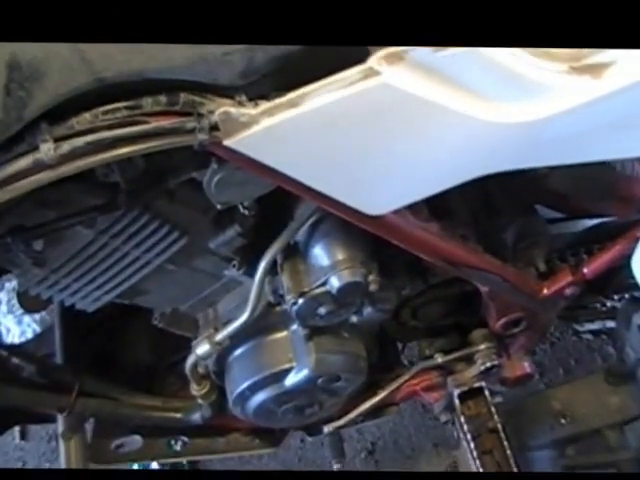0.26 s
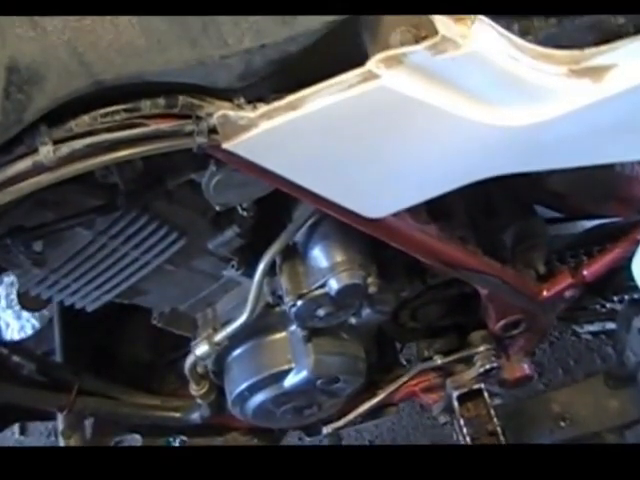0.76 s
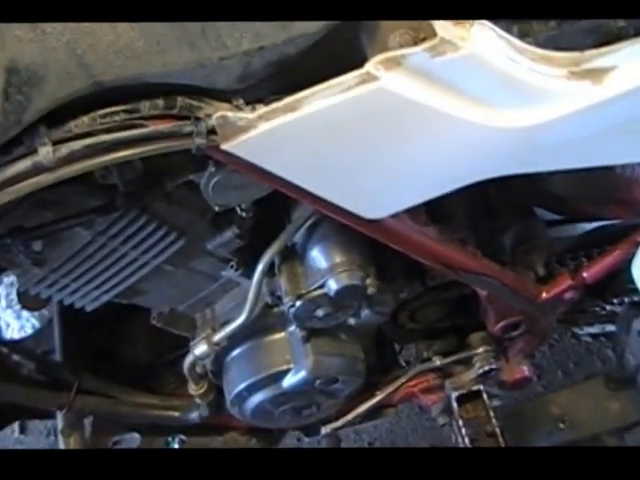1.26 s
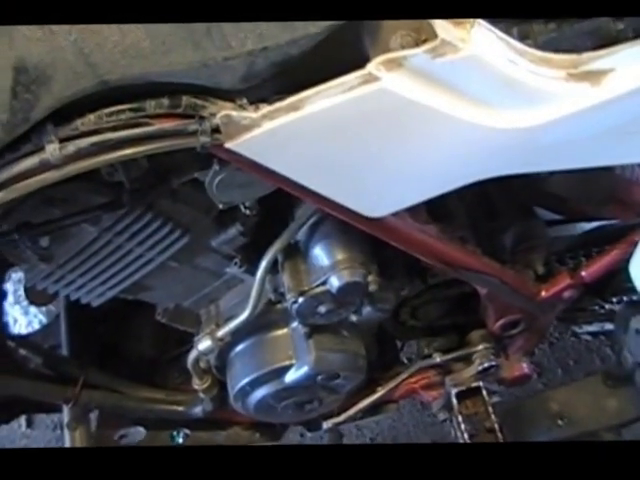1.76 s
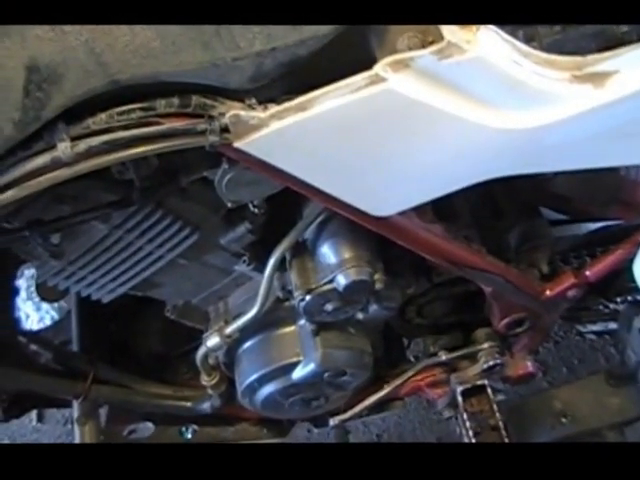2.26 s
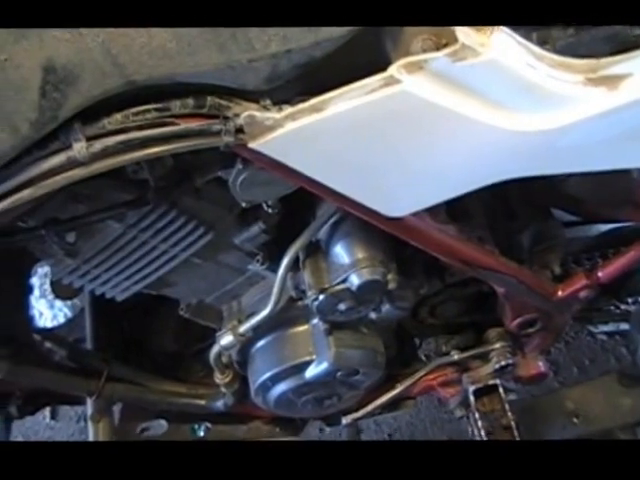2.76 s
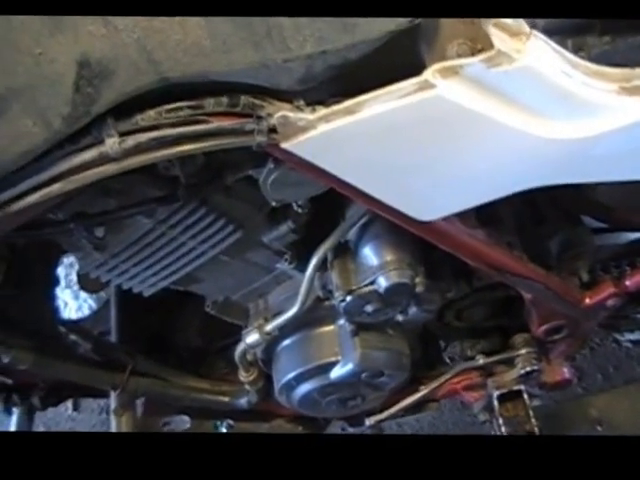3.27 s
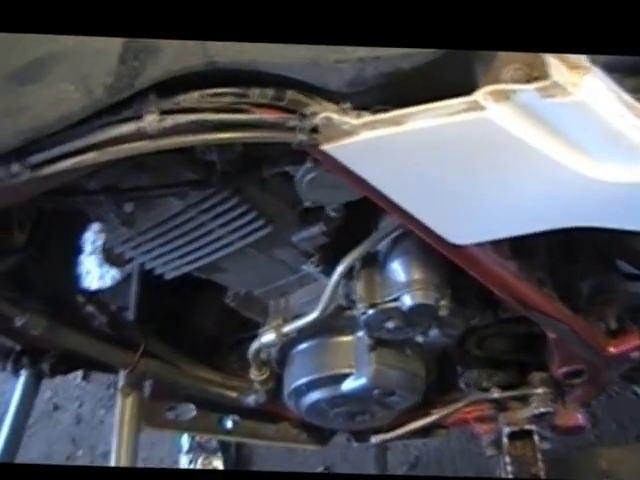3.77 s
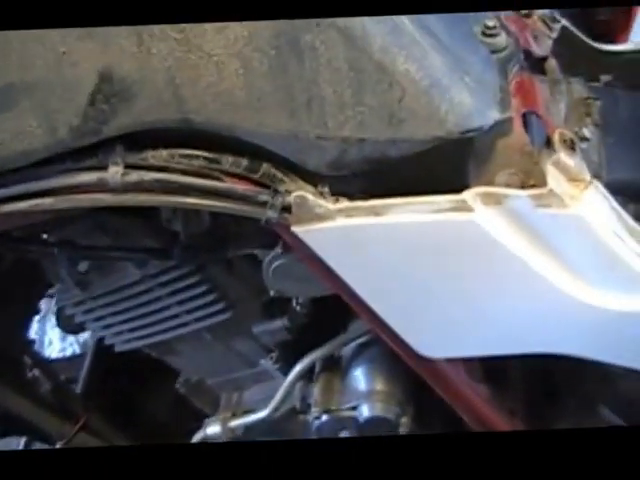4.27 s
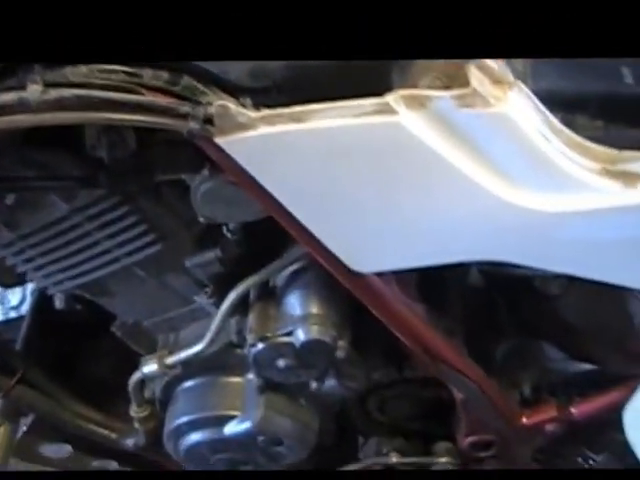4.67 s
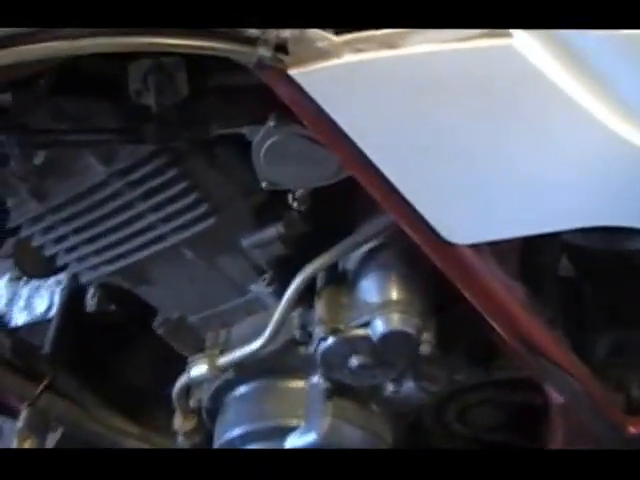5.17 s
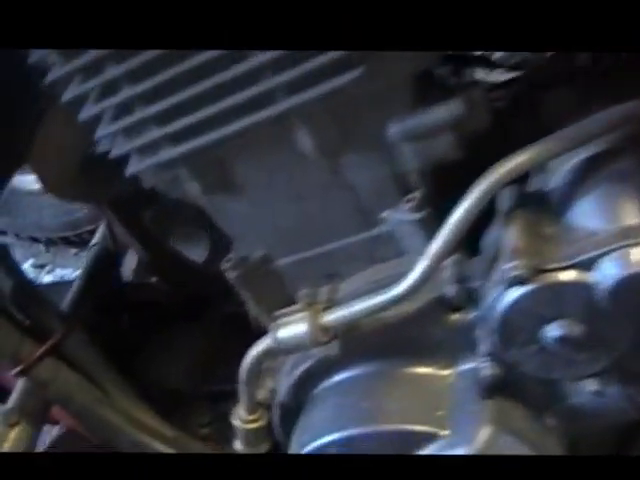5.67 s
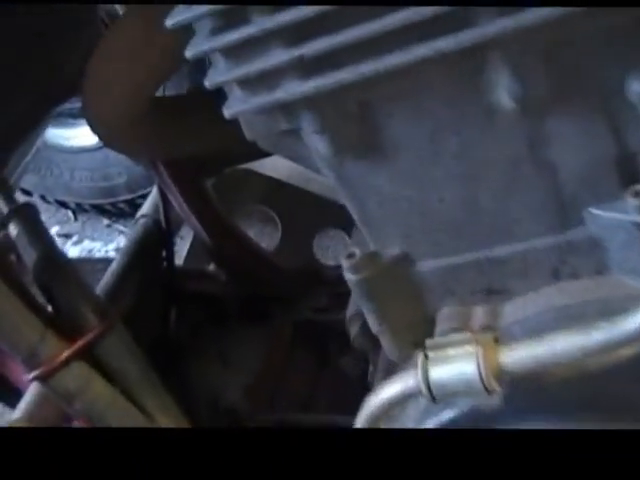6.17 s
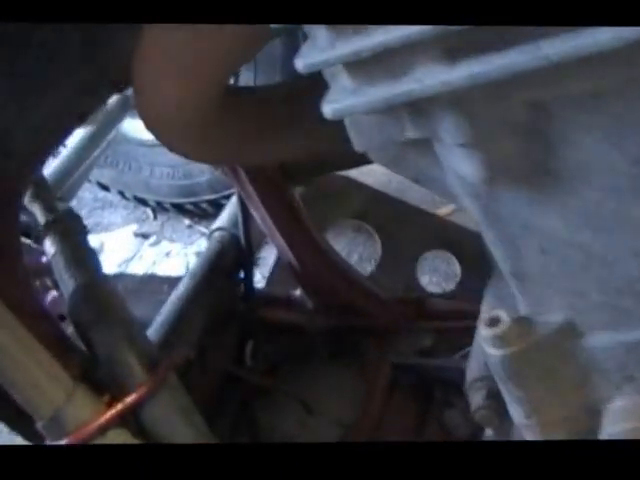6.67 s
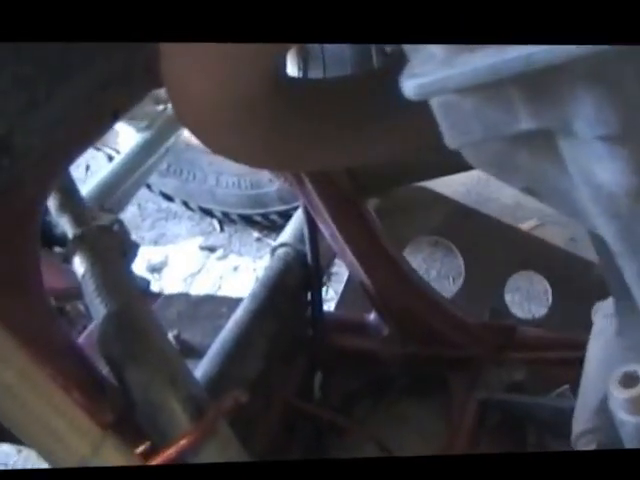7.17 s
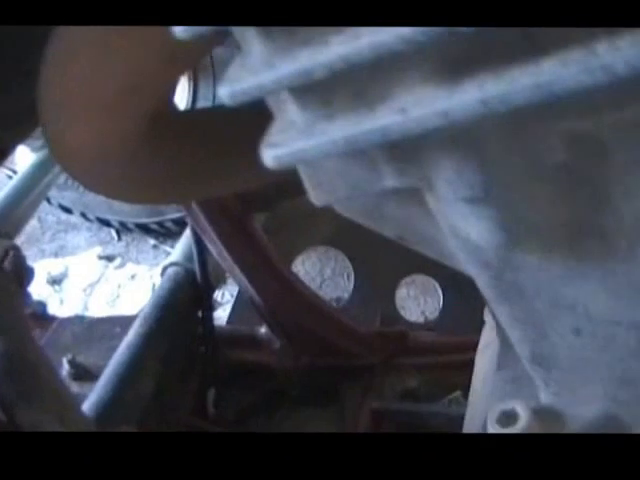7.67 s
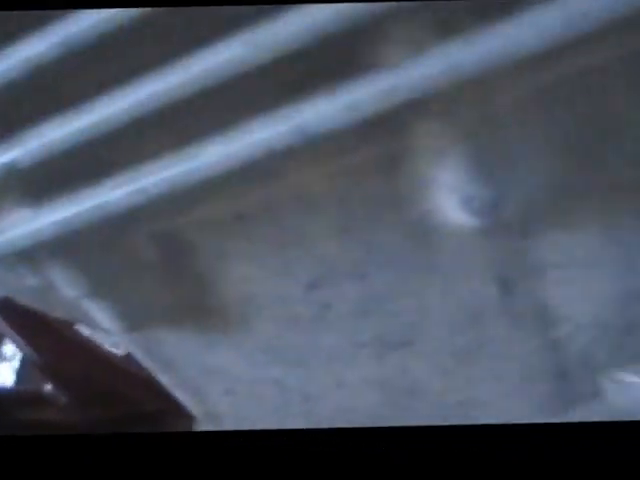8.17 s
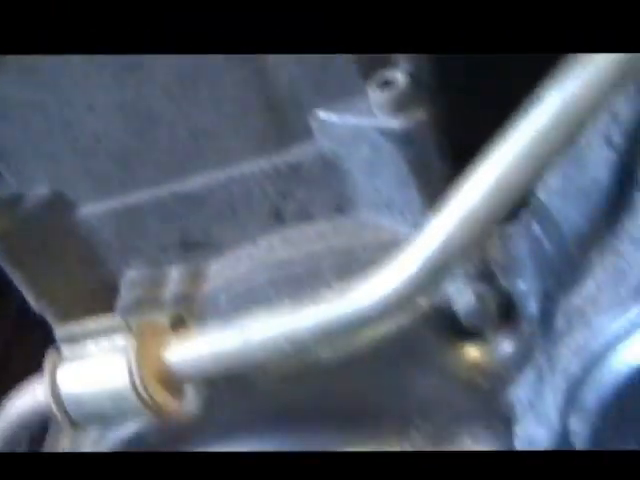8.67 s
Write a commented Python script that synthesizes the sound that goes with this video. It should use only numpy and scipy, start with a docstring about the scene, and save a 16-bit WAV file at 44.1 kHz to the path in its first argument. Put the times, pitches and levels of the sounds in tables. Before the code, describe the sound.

In a garage, an electric starter clanks in and grinds with a metallic squeal. A small single-cylinder four-stroke engine fires once and runs down. On the second try it coughs and catches, puffing loudly on the throttle, then settles into a steady puttering idle. The hand-held microphone moves up to the cylinder, so the ticking valve clatter and gear whine grow louder and clearer.

```python
"""A small one-cylinder four-stroke engine is started in a garage, heard from a hand-held microphone.
The electric starter grinds, the engine fires once and runs down; on the second try it catches and idles.
In each cycle gas puffs from the exhaust, the valves clatter, the gears whine and the piston gulps air.
Their loudness follows the throttle, the speed and the microphone, which moves up to the cylinder and
on to the front. The walls echo, and behind it all are a faint hiss and a faint ticking."""
import sys
import numpy as np
from scipy import signal
from scipy.fft import rfft, irfft, next_fast_len
from scipy.io import wavfile

SR = 44100
rng = np.random.default_rng(int(sys.argv[2]) if len(sys.argv) > 2 else 0)


def unload_audio(sound):
    """Save the sound as a 16-bit wav file, at the path given as the first command line argument."""
    columns = np.transpose(np.atleast_2d(sound))
    # keep every value between -1 and 1, then stretch to whole-number steps
    steps = np.round(np.clip(columns, -1, 1) * 32767)
    wavfile.write(sys.argv[1], SR, steps.astype(np.int16))


N = 392931
TIME = np.arange(N) / SR
IDLE_HZ = 14.1  # firings per second at idle

# lone firings before the engine runs: (time [s], level [dB], puff pitch [Hz])
LONE_FIRINGS = [(1.015, -5, 143), (2.5566, -7.5, 147), (2.771, -11.5, 114)]
# strokes that only pump air out and back in: (time [s], level [dB], pitch [Hz], wait for the gulp [s])
AIR_STROKES = [(1.114, -17.5, 76, 0.024), (1.229, -18, 60, 0.027), (1.39, -24.5, 60, 0.087),
               (1.56, -31.5, 90, 0.043), (2.307, -23.5, 55, .063), (2.68, -22, 107, 0.026)]
# loudness of the puffs; every LOUDNESS table lists (base level [dB], change at full throttle [dB],
# change at the cylinder [dB], change at the front [dB], change per extra firing a second [dB])
EXHAUST_LOUDNESS = (-15, 7, -0.04, -4, 0.08)
def exhaust(at, idle_hz=170, throttle_hz=36, near_hz=15, uneven_db=-1.37, gulp_db=-3.0, gulp_ratio=1.32):
    """Each firing pushes out a puff: louder and deeper with the throttle open, higher from close by."""
    out, chance = np.zeros(N), rng.standard_normal((len(at), 2))
    level_db = loudness(EXHAUST_LOUDNESS, at) + uneven_db * chance[:, 1]
    pitch_hz = idle_hz - throttle_hz * curve(THROTTLE, at)[0] + near_hz * curve(MIC_PATH, at)[0]
    pitch_hz *= 1 + 0.026 * chance[:, 0]
    for row in list(LONE_FIRINGS) + list(zip(at, level_db, pitch_hz)):
        add(out, *puff(*row))
    for s, db, hz, wait in AIR_STROKES:
        add(out, *puff(s, db, hz))
        add(out, *puff(s + wait, db + gulp_db, hz * gulp_ratio))
    return out


# first wall echoes, heard beside the machine and at the cylinder: (delay [ms], strength [factor])
FAR_ECHOES = [(2.93, 0.35), (4.78, 0.57), (7.98, 0.27), (10.58, 0.91), (19.58, -0.41), (26.96, -0.28),
              (30.35, 0.14), (33.02, -0.28), (37.94, 0.16)]
NEAR_ECHOES = [(2.05, 0.75), (9.32, 0.52), (10.89, 0.65), (16.76, 0.54), (18.27, -0.51), (20.47, 0.33),
               (30.6, 0.3), (32.47, -0.26), (41.93, -0.39)]
# low notes at which the silencer and garage boom: (pitch [Hz], width [Hz], level [dB])
BOOM_NOTES = [(68, 52, 7.5), (126, 12.2, 15.5), (145.5, 13, 12.5), (191, 11, 13.5), (258.9, 25.1, 20),
              (333.4, 5, 12.5), (445.6, 23, 7.5), (521.2, 12, 18), (710, 30, -21)]
def puff(s, db, pitch_hz, cut_hz=59, body_hz=45, knee=2.45, leak=0.56, bass_lag_s=0.0022, bass_hz=90):
    """One burst of gas with its wall echoes and boom; gives back its start time and its sound."""
    size, lead = 2 ** 14, 2 ** 9
    hz = np.fft.rfftfreq(size, 1 / SR)[:size // 16]
    pulse = hz / pitch_hz * np.exp(-hz / pitch_hz)
    muffled_hz = knee * pitch_hz * (pitch_hz / 160) ** 0.36
    pulse *= leak + 1 / (1 + (hz / muffled_hz) ** 10)  # the silencer swallows most of the upper part
    u = 1j * hz / body_hz
    pulse *= abs(u * u / (u * u + u + 1)) ** 2  # a small pipe gives off no deep bass
    pulse *= 1 - np.exp(-(hz / cut_hz) ** 10)
    bass_lag = bass_lag_s * bass_hz * np.tanh(hz / bass_hz)  # the bass leaves the silencer last
    pulse = pulse * np.exp(-2j * np.pi * (bass_lag + hz * lead / SR))
    near = curve(MIC_PATH, s)[0]
    far_walls, near_walls = (sum(gain * np.exp(-2j * np.pi * hz * ms / 1000) for ms, gain in echoes)
                             for echoes in (FAR_ECHOES, NEAR_ECHOES))
    walls = 1 + (1 - near) * far_walls + near * near_walls
    sound = irfft(pulse * walls * (1 + resonances(BOOM_NOTES, hz)), size)
    strength = np.sqrt(np.sum(sound ** 2) / (0.036 * SR))  # as if packed into 36 ms
    return s - lead / SR, amp(db) * sound / strength


# engine speed from the moment it catches: (time [s], speed [firings per s])
ENGINE_SPEED = [(2.895, 10.733), (3.4, 11.09), (3.743, 12.642), (3.933, 12.423), (4.79, 14.065),
                (5.244, 13.711), (5.687, 14.27), (5.953, 13.252), (6.322, 14.828), (6.785, 14.35),
                (7.417, 14.134), (7.835, 16.674), (8.155, 14.657), (8.8, 14.067)]
def firings():
    """Times at which the running engine fires, once in each whole cycle."""
    t = TIME[TIME >= ENGINE_SPEED[0][0]]
    cycles_done = np.cumsum(curve(ENGINE_SPEED, t)[0]) / SR
    return np.interp(np.arange(int(cycles_done[-1]) + 1), cycles_done, t)


# the throttle is held open to start, then let go: (time [s], opening [0-1])
THROTTLE = [(2.9, 0.98), (3.95, 0.69), (4.14, 0.13), (4.9, 0.04)]
# where the microphone is: (time [s], nearness to the cylinder [0-1], way to the front [0-1])
MIC_PATH = [(5.2, .2, 0.12), (6.25, .94, 0.44), (7.1, 0.92, 1), (8.8, 1, 0.87)]
def loudness(table, t=TIME):
    """Level in dB of one engine part, from the throttle, the speed and the microphone's place."""
    base_db, throttle_db, near_db, front_db, speed_db = table
    near, front = curve(MIC_PATH, t)
    opening = curve(THROTTLE, t)[0]
    extra_speed = curve(ENGINE_SPEED, t)[0] - IDLE_HZ
    return base_db + throttle_db * opening + near_db * near + front_db * front + speed_db * extra_speed


# loudness of the pipe's note, columns as in EXHAUST_LOUDNESS
BARK_LOUDNESS = (-33.5, 5.5, -1, 9, -0.6)
def pipe_barks(at, hz=532, width_hz=70, decay_s=0.025):
    """The gas of each firing sets the exhaust pipe ringing with a hollow note."""
    rows = np.c_[at, loudness(BARK_LOUDNESS, at), np.full(len(at), decay_s)]
    return blows(rows, rise_s=0.0067) * resonate(grit(9000, 0.64), hz, width_hz)


# loudness of the gulps, columns as in EXHAUST_LOUDNESS
GULP_LOUDNESS = (-52.5, 0, 3, 9, -4)
def air_gulps(at, cycle_share=.76, pitch_hz=115):
    """Late in each cycle the piston gulps air through the filter box."""
    out, when = np.zeros(N), at + cycle_share * np.gradient(at)
    for s, db in zip(when, loudness(GULP_LOUDNESS, when)):
        add(out, *puff(s, db, pitch_hz))
    return out


# loudness of the clatter, columns as in EXHAUST_LOUDNESS
CLATTER_LOUDNESS = (-34, 12.5, 15, -0.45, 0.56)
def valve_cycles(at, starting_period_s=.09, starting_db=-25):
    """Time, length and clatter level of each cycle, first on the starter and then running."""
    strokes = [row[0] for row in list(LONE_FIRINGS) + list(AIR_STROKES)]
    each = np.ones(len(strokes))
    period_s = np.r_[starting_period_s * each, np.gradient(at)]
    level_db = np.r_[starting_db * each, loudness(CLATTER_LOUDNESS, at)]
    return np.r_[strokes, at], period_s, level_db


# tone of the valves' clatter and of their lighter tick: (frequency [Hz], level [dB])
CLATTER_TONE = [(200, -50.5), (550, 1.5), (1000, 3.5), (2000, -8), (3200, -3), (4300, 1.5), (5300, -3),
                (7500, 2), (9500, -4.5), (12000, -14), (14000, -22.5), (16500, -59)]
TICK_TONE = [(1500, -41), (3000, 12), (4400, -21), (5400, 16.5), (7200, 15), (9000, 7), (12000, -47),
             (16000, -52)]
def valves(at, period_s, level_db, slap_s=0.0148, scrape_lead_s=0.0037, bounce_s=0.0033, tick_s=0.0226):
    """The valves strike twice a cycle: a scrape leads into a slap that bounces, then comes a tick."""
    chance, each = rng.standard_normal((len(at), 4)), np.ones(len(at))
    slap_at = at + slap_s + 0.31 * (period_s - np.median(period_s)) + 0.00026 * chance[:, 0]
    bounce_at = slap_at + bounce_s * (1 + .2 * rng.standard_normal(len(at)))
    tick_at = slap_at + tick_s + .0005 * chance[:, 2]
    settling_db = np.interp(at, [3.6, 4.6], [-13, 0])  # the tick comes out as the idle settles
    passing_db = 8 * bump(at, 5.95, 0.28)  # the microphone passes the valve cover
    scrape = np.c_[slap_at - scrape_lead_s, level_db - 7, .008 * each]
    slap = np.c_[slap_at, level_db + 6 + .5 * chance[:, 1], .0055 * each]
    bounce = np.c_[bounce_at, level_db + 1, .004 * each]
    tick = np.c_[tick_at, level_db + settling_db + passing_db + 1.6 * chance[:, 3], .003 * each]
    strikes = np.hypot(blows(np.r_[slap, bounce], rise_s=0.0021), blows(scrape, rise_s=0.001))
    rattle = strikes * grit(22000, 0.56) * unit(amp(1.43 * drift(900)))
    ticks = blows(tick, rise_s=0.00084) * grit(17000, 1.0)
    return colour(rattle, CLATTER_TONE) + colour(ticks, TICK_TONE)


# loudness of the thuds, columns as in EXHAUST_LOUDNESS
THUD_LOUDNESS = (-27, 4, 4.5, -2.5, .3)
# their dull tone: (frequency [Hz], level [dB])
THUD_TONE = [(200, -31), (520, 2.5), (800, 3.5), (1300, 0.5), (2100, 2.5), (3200, -16), (8000, -45)]
def cylinder_thuds(at, cycle_share=0.189, decay_s=0.0078):
    """The top of the cylinder knocks as the valves slap."""
    when = at + cycle_share * np.gradient(at)
    rows = np.c_[when, loudness(THUD_LOUDNESS, at), np.full(len(at), decay_s)]
    return colour(blows(rows, rise_s=0.0027) * grit(9000, 1.0), THUD_TONE)


# tone of the churning chain and gears: (frequency [Hz], level [dB])
CHURN_TONE = [(35, -45), (60, -22), (130, 6), (300, 11), (520, 8.5), (620, 3), (780, 8), (930, -1),
              (1250, 3.5), (1550, -14), (2000, -8.5), (2500, -12.5), (7500, -12), (11000, -28),
              (15000, -69)]
# loudness of the churn and the whine, columns as in EXHAUST_LOUDNESS
CHURN_LOUDNESS = (-37, 7, 2, 2.5, 0.33)
WHINE_LOUDNESS = (-39.5, 3, 10, 1, 0.2)
def gears(angle, whine_hz=1345, bend=0.016):
    """Chain and gears churn and chatter, and their whine swells just before each firing."""
    churn = colour(grit(7000, 1.4), CHURN_TONE) * amp(loudness(CHURN_LOUDNESS) + 4.5)
    chatter = colour(grit(400, 4.5), CLATTER_TONE) * amp(loudness(CLATTER_LOUDNESS) - 24)
    teeth = resonate(grit(9000, 1.0), whine_hz * (1 + bend * np.cos(angle - 4.0)), width_hz=140)
    whine = unit(teeth * amp(7.5 * np.cos(angle - 6.0))) * amp(loudness(WHINE_LOUDNESS) - 1)
    return churn + chatter + whine


# loudness of the rasp, columns as in EXHAUST_LOUDNESS
RASP_LOUDNESS = (-46.5, 10.5, 7.5, -2.5, -0.5)
def carburettor(angle, rasp_hz=1900, bend=0.071):
    """Air rasps through the carburettor each time the cylinder breathes in."""
    rasp = resonate(grit(6000, 1.6), rasp_hz * (1 + bend * np.sin(angle - 4.9)), width_hz=660)
    passing_db = 6 * bump(TIME, 8.68, 0.19)  # the microphone passes it
    return unit(rasp * amp(8.6 * np.cos(angle - 5.2))) * amp(loudness(RASP_LOUDNESS) + passing_db)


# notes of the cylinder and its fins: (pitch [Hz], width [Hz], level [dB], time the microphone passes [s])
FIN_NOTES = [(2850, 103, 14.5, 8), (3674, 182, 13, 6.4), (4276, 120, 11.5, 7.43), (6300, 500, -2, 4.7),
             (8000, 250, -7, 7.7), (9700, 130, -21, 10)]
def cooling_fins(clatter, passing_db=6, passing_s=1.0, uneven_db=3, far_db=-2):
    """Adds the cylinder's uneven ringing to the clatter; each note swells as the microphone passes."""
    out = clatter.copy()
    distance_db = far_db * (1 - curve(MIC_PATH)[0])
    for hz, width, db, s in FIN_NOTES:
        ring = signal.lfilter(*signal.iirpeak(hz, hz / width, SR), clatter)
        wander_db = uneven_db * np.tanh(drift(IDLE_HZ))
        swell_db = passing_db * (bump(TIME, s, passing_s) - 1.5)
        out += ring * amp(db + distance_db + wander_db + swell_db)
    return out


# tone of the starter's high grind and low growl: (frequency [Hz], level [dB])
GRIND_TONE = [(900, -12), (1600, -0.5), (2700, 2), (3600, 0), (5000, -6.5), (7500, -0.5), (10000, -11.5),
              (12500, -16), (14500, -44), (16500, -63)]
GROWL_TONE = [(90, -23.5), (230, 8), (400, -3.5), (700, 3), (1300, -8), (1900, -2), (3500, -54)]
# notes at which the engine and starter cases ring: (pitch [Hz], width [Hz], level [dB])
CASE_NOTES = [(527, 34, -4.5), (693, 28, -21), (1290, 125, 4), (2380, 32, 1), (2460, 40, -4.5),
              (3280, 68, 2), (3770, 30, 4.5), (4210, 26, -0.5), (5280, 57, -6.5), (7040, 110, -27),
              (8300, 55, -10.5), (9630, 50, -22)]
def starter(squeal_db=-9, overtone_db=-15, buzz_db=-8, wobble=.012, shudder_s=0.048):
    """Gear teeth and chain hammer the case and squeal with the speed; each clank makes them shudder."""
    high, low, powered, tooth_hz = starter_motion()
    shudder = blows([(s, db, shudder_s) for s, _, _, db in METAL_BLOWS], rise_s=0.0041)
    low = np.hypot(low, shudder)
    chain_angle = 2 * np.pi * np.cumsum(tooth_hz) / SR / 20
    links = unit(amp(0.48 * np.cos(chain_angle) + 1.2 * drift(200)))
    squeal = amp(squeal_db) * resonate(grit(9000, 1.0), tooth_hz, width_hz=170)
    squeal += amp(overtone_db) * resonate(grit(10000, 1.0), 2.25 * tooth_hz, width_hz=110)
    squeal *= powered * (1 + np.tanh(drift(50)))  # the teeth bite in short fits
    shaft_angle = 2 * np.pi * np.cumsum(tooth_hz * (1 + wobble * drift(60))) / SR / 10
    overtones = sum(np.cos(k * shaft_angle + 2 * np.pi * rng.random()) for k in range(3, 28))
    buzz = powered * amp(buzz_db) * unit(overtones)
    grind = colour(high * links * (grit(14000, 1.5) + buzz), GRIND_TONE, CASE_NOTES)
    growl = colour(low * links * grit(7000, 1.8), GROWL_TONE, CASE_NOTES)
    return amp(-2) * grind + amp(-0.5) * growl + high * squeal


# the starter button: (time pressed [s], time let go [s])
BUTTON_PRESSES = [(0.887, 1.669), (2.149, 2.976)]
# the gears screech as they take the load: (time [s], level [dB], rise [s], squeal pitch [Hz])
SCREECHES = [(0.95, -17.5, .045, 4180), (1.315, -25.5, .035, 3110), (1.454, -30, .04, 2560),
             (1.658, -22.5, 0.0202, 3330), (2.212, -18.5, 0.055, 3360), (2.335, -17, 0.0102, 3196),
             (2.399, -14.5, 0.028, 3300), (2.84, -25.5, .05, 3380)]
def starter_motion(grind_db=-29.5, growl_db=-28.5, free_hz=3352, spin_up_s=0.023, run_down_s=0.5):
    """The motor spins up, runs and coasts down; each strain swells the grind and bends its pitch."""
    turning, powered, strain = np.zeros((3, N))
    tooth_hz = free_hz * np.ones(N)
    for s, db, rise, hz in SCREECHES:
        swell = bump(TIME, s, np.where(TIME < s, rise, 1.45 * rise))
        strain += (amp(db) * swell) ** 2
        tooth_hz += swell * (hz - tooth_hz)
    for pressed, let_go in BUTTON_PRESSES:
        on = TIME >= pressed
        coasting = np.maximum(TIME - let_go, 0) / run_down_s
        turning += on * amp(-60 * coasting ** 1.58)
        powered += on * np.exp(-10 * coasting)
        tooth_hz *= 1 - on * 0.35 * np.exp(-abs(TIME - pressed) / spin_up_s)
    high = turning * np.sqrt(amp(grind_db) ** 2 + strain)
    return high, turning * amp(growl_db), powered, tooth_hz * piston_drag()


def piston_drag(dip=.1, lead_s=0.00993, width_s=.04):
    """Share of its speed that the starter keeps each time the piston squeezes the air."""
    strokes = list(LONE_FIRINGS) + list(AIR_STROKES)
    return np.prod([1 - dip * bump(TIME, row[0] - lead_s, width_s) for row in strokes], axis=0)


# blows of the switch, starter drive and clutch: (time [s], level [dB], fade [s], shudder level [dB])
METAL_BLOWS = [(0.814, -46, 0.015, -65), (0.888, -2.5, 0.003, -18.5), (1.334, -8, 0.0058, -29),
               (1.487, -12, 0.0072, -40), (1.577, -9, 0.0074, -20), (2.151, -8, 0.0032, -15.5),
               (2.495, -14.5, 0.024, -20), (2.872, -23, 0.005, -19.5)]
# dull knocks as the machine is handled: (time [s], level [dB], fade [s])
HANDLING_KNOCKS = [(0.001, -26.5, 0.013), (0.014, -36.5, 0.036)]
# tone of a clank and of a knock: (frequency [Hz], level [dB])
CLANK_TONE = [(150, -35), (700, -18), (2000, 1), (3200, 0), (5000, -5.5), (8000, 0.5), (11000, -13),
              (14000, -27), (16500, -47)]
KNOCK_TONE = [(80, -12), (250, -4.5), (420, 0.5), (700, -8), (1500, -15.5), (3000, -17), (7000, -15.5),
              (12000, -37), (16000, -65)]
def clanks(crack_db=-6.0, crack_lead_s=0.0044, crack_s=0.0083):
    """Metal blows ring the case, as does each lone firing just before its puff; handling adds knocks."""
    cracks = [(s - crack_lead_s, db + crack_db, crack_s) for s, db, _ in LONE_FIRINGS]
    hits = [row[:3] for row in METAL_BLOWS] + cracks
    metal = colour(blows(hits, rise_s=0.00009) * grit(14000, 0.49), CLANK_TONE, CASE_NOTES)
    knocks = colour(blows(HANDLING_KNOCKS, rise_s=0.00022) * grit(14000, 1.5), KNOCK_TONE)
    return metal + knocks


# how long the garage echoes: (frequency [Hz], time to fade by 60 dB [s])
ECHO_TIMES = [(100, 0.74), (500, 0.13), (3000, 0.2), (8000, 0.083), (15000, 0.41)]
def garage(x, first_echo_s=0.0096, echoes_per_s=3000):
    """The walls throw back scattered echoes, and each frequency fades at its own speed."""
    t = np.arange(SR // 2) / SR
    echoes = rng.choice([-1., 1.], len(t)) * (rng.random(len(t)) < echoes_per_s / SR)
    hz, s, bands = signal.stft(echoes * (t > first_echo_s), SR, nperseg=256)
    fade = amp(-60 * s / read(ECHO_TIMES, hz)[:, None])
    tail = signal.istft(bands * fade, SR, nperseg=256)[1]
    return signal.fftconvolve(x, tail / np.linalg.norm(tail))[:N]


# tone of the background hiss: (frequency [Hz], level [dB])
HISS_TONE = [(18, -47), (30, -33), (87, 3), (107, -13.5), (171, -6), (346, -15.5), (735, -15.5),
             (1520, -24.5), (1870, -18), (2560, -28.5), (2770, -30.5), (7240, -30.5), (15000, -53)]
# the recorder's gain on the hiss, dipping and recovering: (time [s], level change [dB])
HISS_GAIN = [(0.2, 1), (0.8, 4.5), (2.05, -1.5), (3, 16)]
def background_hiss(db=-57):
    """A faint background hiss that rises and dips with the recorder's gain."""
    return amp(db + curve(HISS_GAIN)[0]) * colour(rng.standard_normal(N), HISS_TONE)


def ticking(db=-58, hz=2900, per_s=30, uneven_db=4, decay_s=.005):
    """A faint, quick ticking in the background."""
    at = np.arange(0, N / SR, 1 / per_s)
    rows = np.c_[at, db + uneven_db * rng.standard_normal(len(at)), np.full(len(at), decay_s)]
    return blows(rows, rise_s=0.0012) * resonate(grit(9000, 0.9), hz, width_hz=400)


# how much left and right differ: (frequency [Hz], side level against the middle [dB])
STEREO_WIDTH = [(60, -16.5), (200, -23.5), (600, -16), (2000, -17.5), (4500, -12), (7000, -10.5),
                (9500, 0.5), (13000, -9.5)]
def stereo(mid, spread_s=0.0017):
    """The microphone's two sides hear nearly the same bass, but scattered treble differs between them."""
    size = 2 ** 9
    hz, t = np.fft.rfftfreq(size, 1 / SR), np.arange(size) / SR
    scatter = np.tanh(3 * unit(rfft(rng.standard_normal(size) * np.exp(-t / spread_s)).real))
    response = np.roll(irfft(1j * unit(scatter) * amp(read(STEREO_WIDTH, hz))), size // 2)
    side = signal.fftconvolve(mid, response * np.hanning(size))[size // 2:][:N]
    return np.array([mid + side, mid - side])


def amp(db):
    """Turns decibels into a factor to multiply by."""
    return 10 ** (np.asarray(db) / 20)


def unit(x):
    """Scales a signal to an average strength (rms) of 1."""
    return x / np.sqrt(np.mean(x ** 2) + 1e-20)


def bump(t, centre_s, width_s):
    """A smooth hill that reaches 1 at its centre."""
    return np.exp(-((t - centre_s) / width_s) ** 2)


def curve(rows, t=TIME):
    """Reads every column of a table at the times t."""
    s, *columns = np.transpose(rows)
    return [np.interp(t, s, c) for c in columns]


def read(points, hz):
    """Reads a table at the frequencies hz, sliding evenly through each octave."""
    f, value = np.transpose(points)
    return np.interp(np.log(hz + 1), np.log(f), value)


def add(mix, s, sound):
    """Adds a sound to the mix at s seconds."""
    part = mix[max(round(s * SR), 0):][:len(sound)]
    part += sound[:len(part)]


def resonances(notes, hz):
    """How a set of ringing notes answers each frequency."""
    return sum(amp(db) / (1 + 2j * (hz - centre) / width) for centre, width, db in notes)


def resonate(x, hz, width_hz):
    """Makes x ring in a narrow band around the pitch hz, which may move."""
    turn = np.exp(2j * np.pi * np.cumsum(hz * np.ones(N)) / SR)
    fade = np.exp(-np.pi * width_hz / SR)
    return unit((turn * signal.lfilter([1.], np.poly([fade, fade]), x / turn)).real)


def colour(x, tone, notes=()):
    """Gives x a tone and ringing notes; plain hiss keeps its power."""
    size = next_fast_len(N + SR // 4)
    hz = np.fft.rfftfreq(size, 1 / SR)
    response = amp(read(tone, hz)) * (1 + resonances(notes, hz))
    return irfft(rfft(x, size) * response / np.sqrt(np.mean(abs(response) ** 2)), size)[:N]


def drift(per_s):
    """Smooth random wandering of strength 1."""
    knots = rng.standard_normal(N // 16)
    return unit(np.interp(TIME * per_s, np.arange(len(knots)), knots))


def grit(per_s, spread_db):
    """Many tiny impacts of uneven size."""
    size = amp(spread_db * np.minimum(rng.exponential(1, N), 4))
    return unit(rng.standard_normal(N) * size * (rng.random(N) < per_s / SR))


def blows(rows, rise_s):
    """Loudness outline of blows that swell and die away: (time [s], level [dB], fade [s])."""
    power, t = np.zeros(N), np.arange(SR // 5) / SR
    for s, db, decay in rows:
        add(power, s, (amp(db) * (1 - np.exp(-t / rise_s)) * np.exp(-t / decay)) ** 2)
    return np.sqrt(power)


def scene(metal_room_db=-7, exhaust_room_db=-17):
    """Engine and starter in the garage, over faint hiss and ticking."""
    at = firings()
    cycle_starts = np.r_[at, 2 * at[-1] - at[-2]]
    angle = 2 * np.pi * np.interp(TIME, cycle_starts, np.arange(len(cycle_starts)))  # one circle a cycle
    running = np.clip((TIME - at[0]) / 0.11, 0, 1)  # fades in as the engine catches
    gas = exhaust(at) + air_gulps(at) + pipe_barks(at)
    clatter = valves(*valve_cycles(at)) + running * (gears(angle) + carburettor(angle))
    metal = amp(-1.5) * cooling_fins(clatter) + cylinder_thuds(at) + starter() + clanks()
    room = garage(amp(metal_room_db) * metal + amp(exhaust_room_db) * gas)
    return stereo(gas + metal + room + background_hiss() + ticking())


def record(dry, top_hz=16300):
    """The loudest firings overload and are softly flattened; the highest treble is cut off."""
    clipped = dry / (1 + dry ** 8) ** (1 / 8)
    treble_cut = signal.firwin(511, top_hz, window=("kaiser", 9), fs=SR)
    return signal.oaconvolve(clipped, treble_cut[None], "same")


dry = scene()
out = record(dry)
unload_audio(out)
```